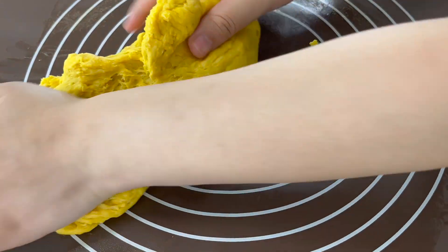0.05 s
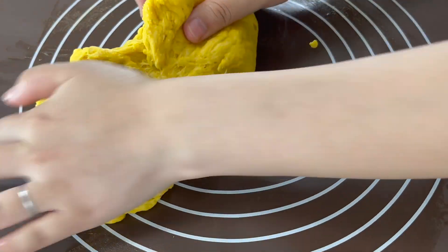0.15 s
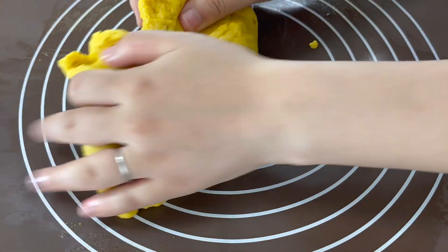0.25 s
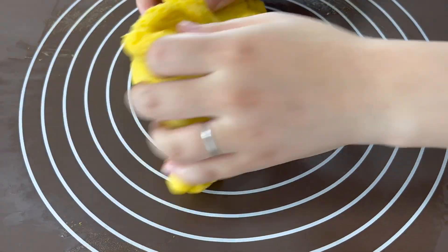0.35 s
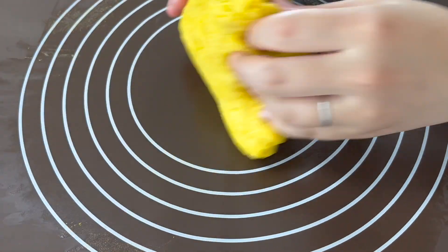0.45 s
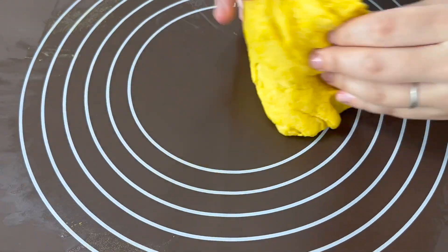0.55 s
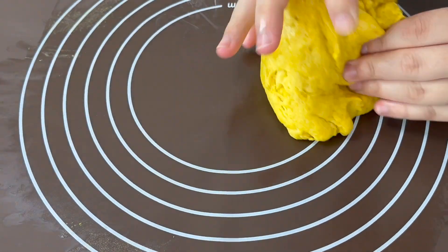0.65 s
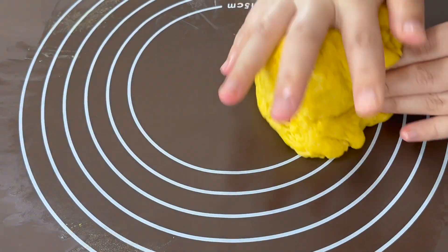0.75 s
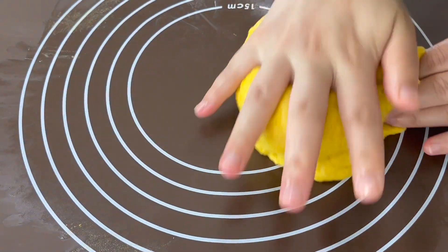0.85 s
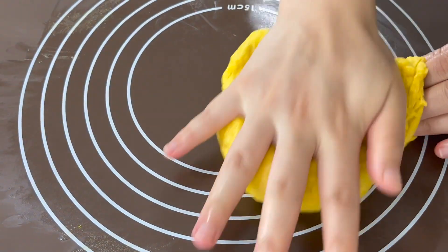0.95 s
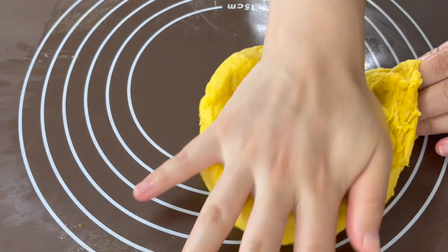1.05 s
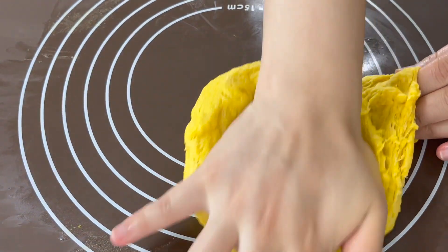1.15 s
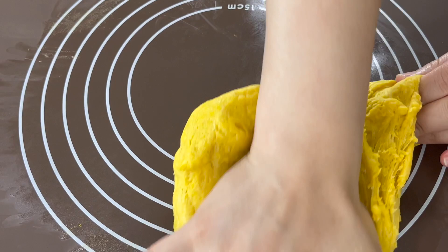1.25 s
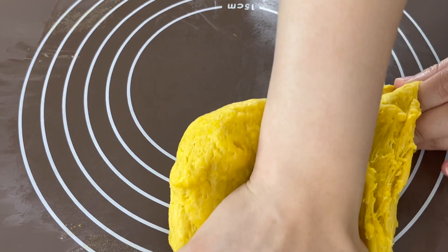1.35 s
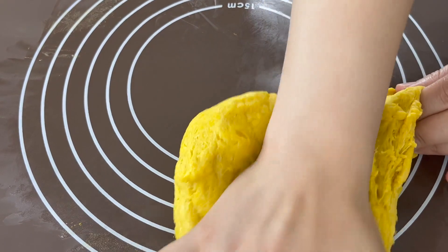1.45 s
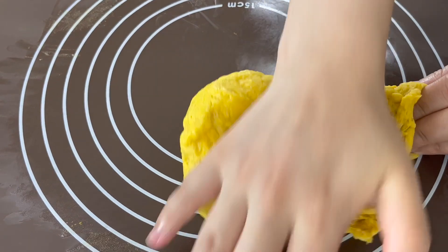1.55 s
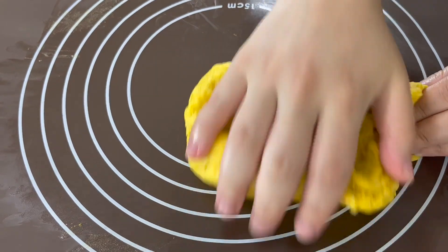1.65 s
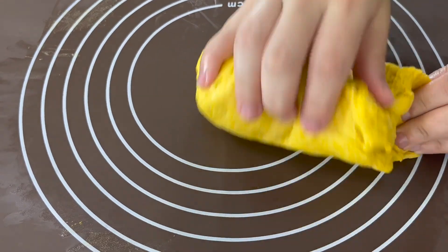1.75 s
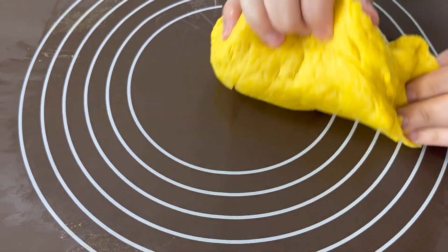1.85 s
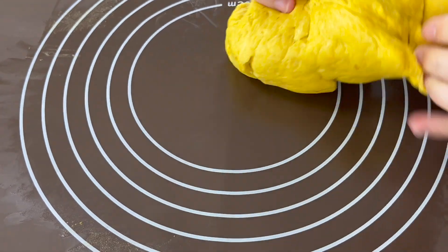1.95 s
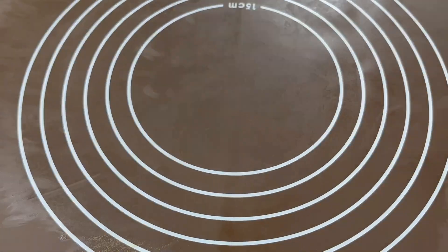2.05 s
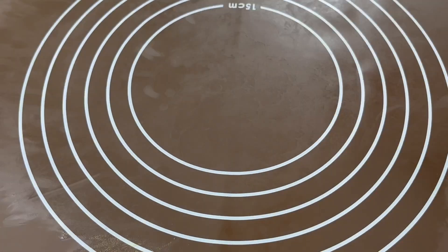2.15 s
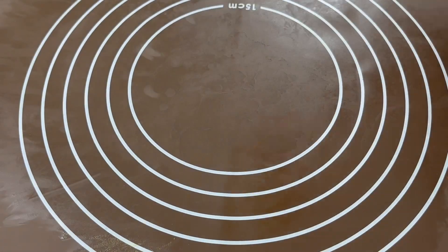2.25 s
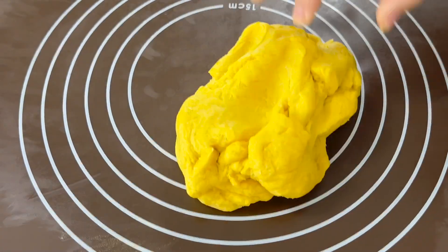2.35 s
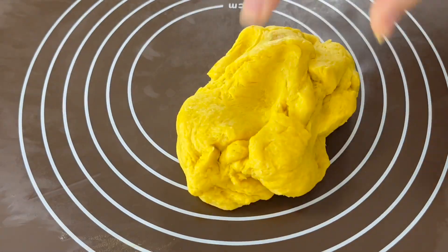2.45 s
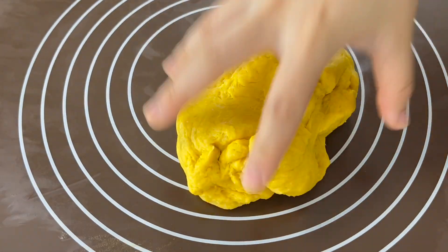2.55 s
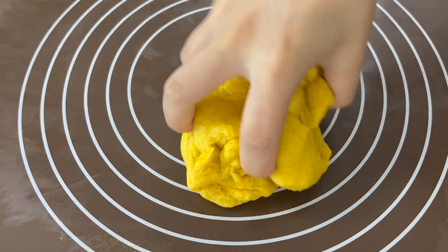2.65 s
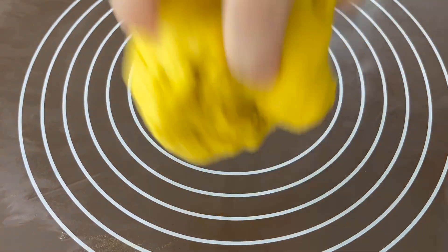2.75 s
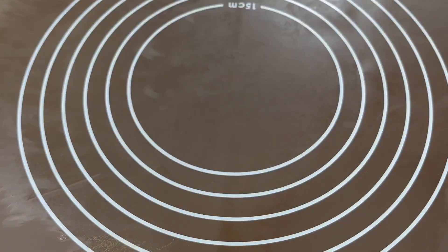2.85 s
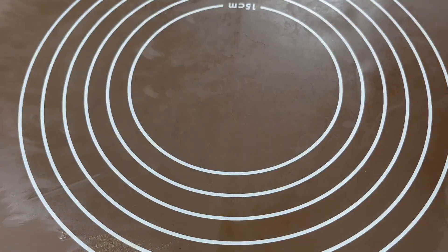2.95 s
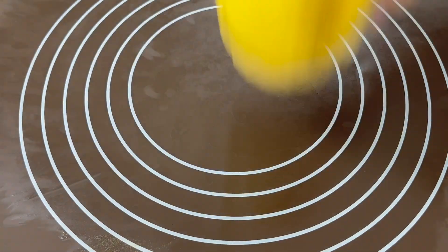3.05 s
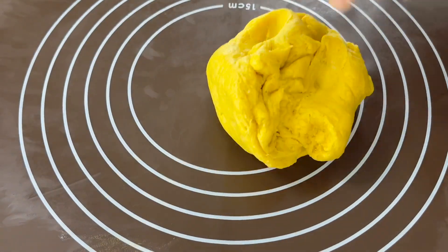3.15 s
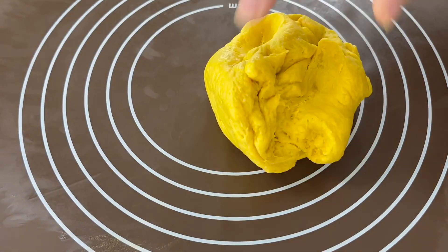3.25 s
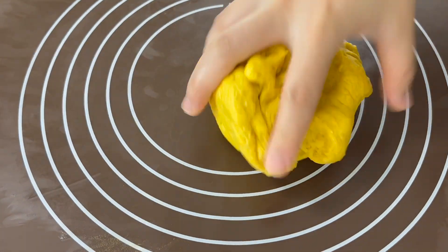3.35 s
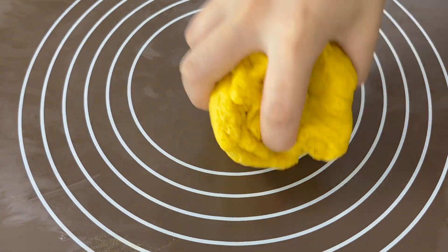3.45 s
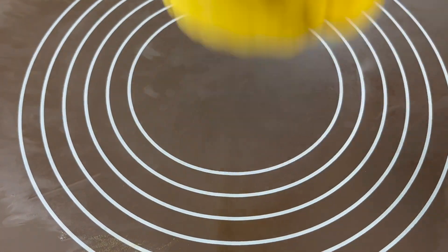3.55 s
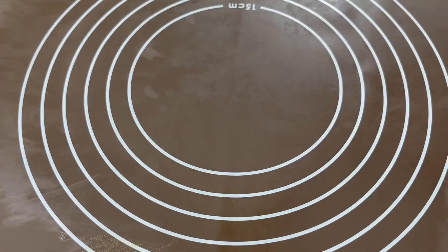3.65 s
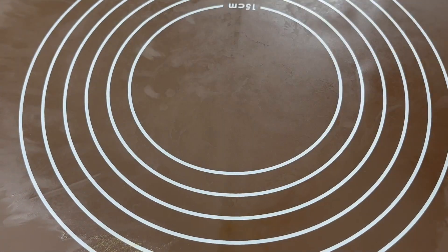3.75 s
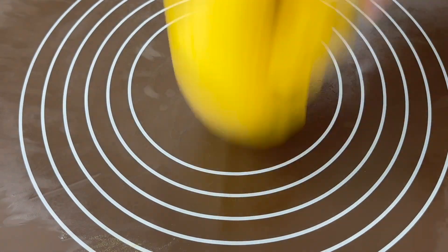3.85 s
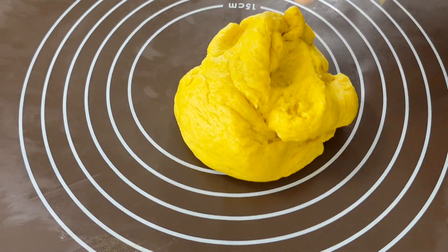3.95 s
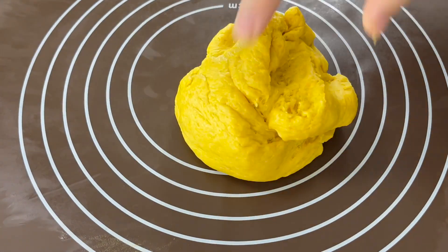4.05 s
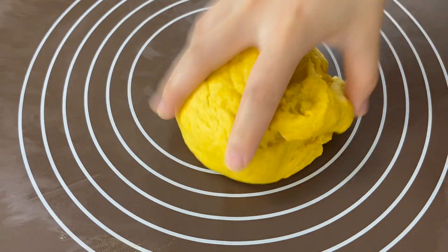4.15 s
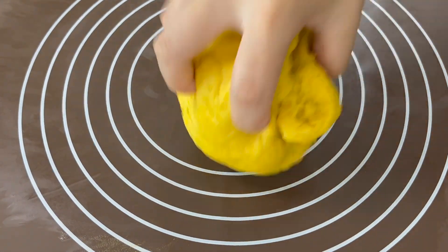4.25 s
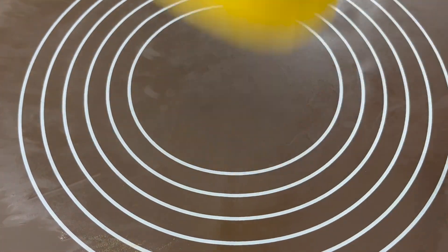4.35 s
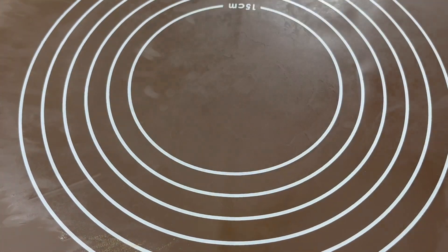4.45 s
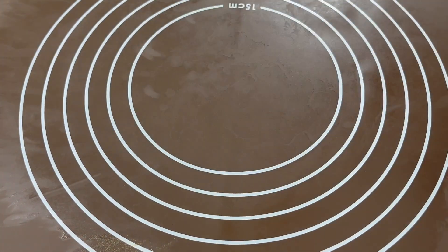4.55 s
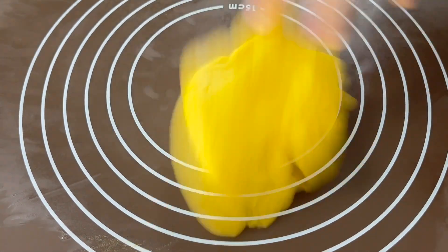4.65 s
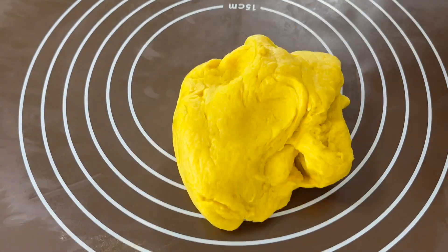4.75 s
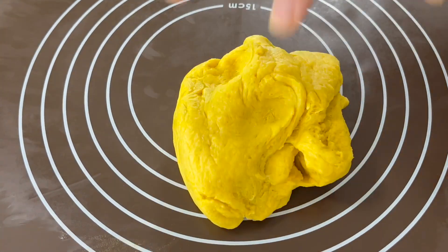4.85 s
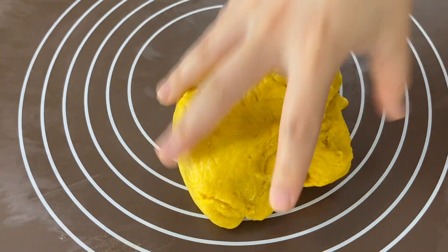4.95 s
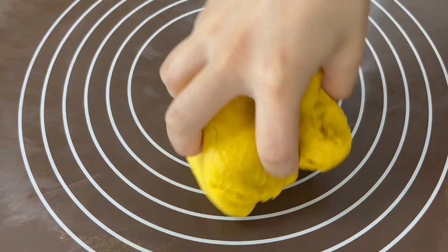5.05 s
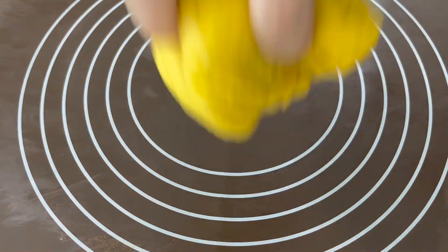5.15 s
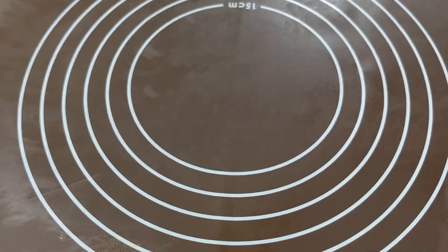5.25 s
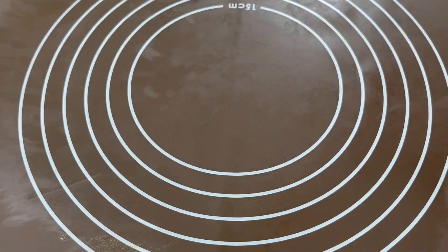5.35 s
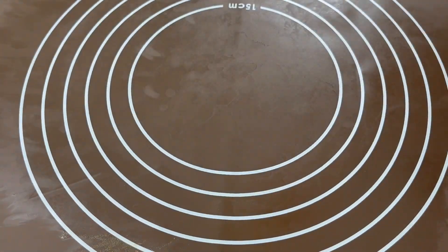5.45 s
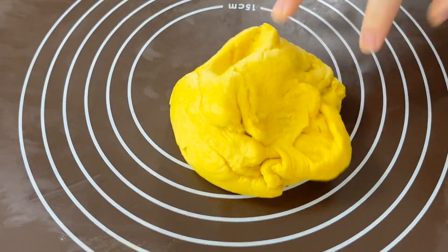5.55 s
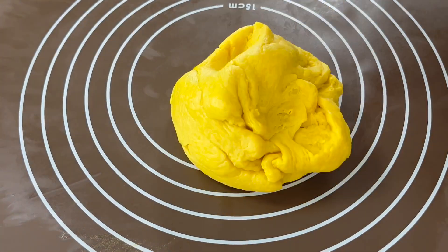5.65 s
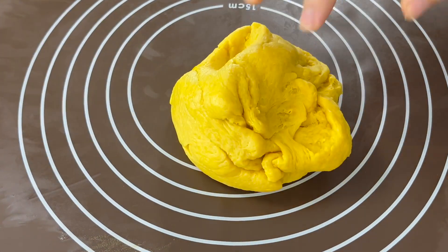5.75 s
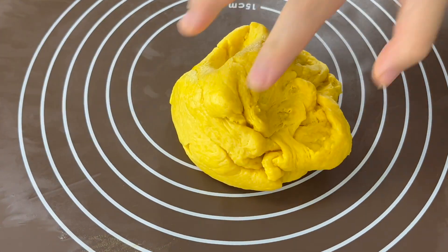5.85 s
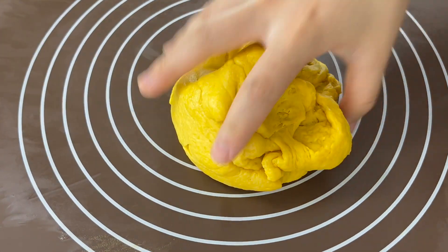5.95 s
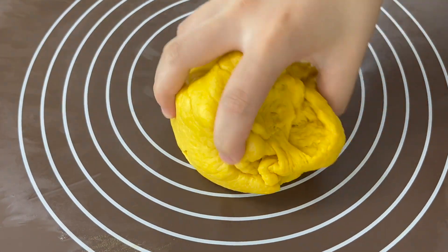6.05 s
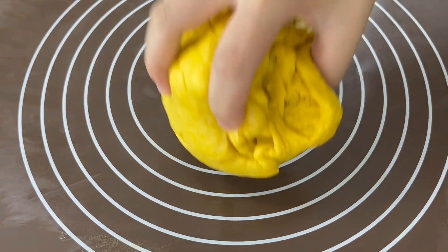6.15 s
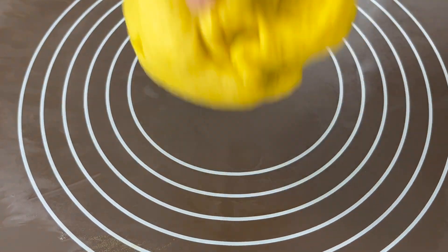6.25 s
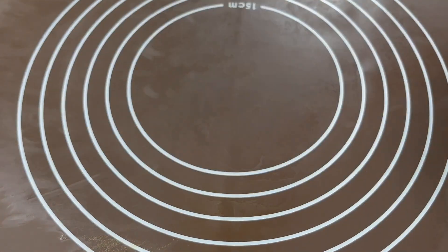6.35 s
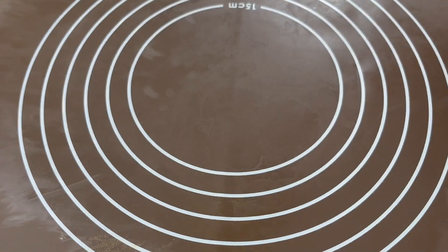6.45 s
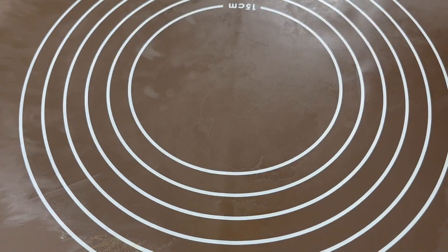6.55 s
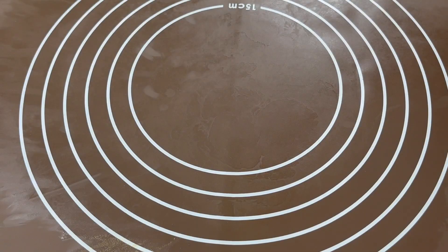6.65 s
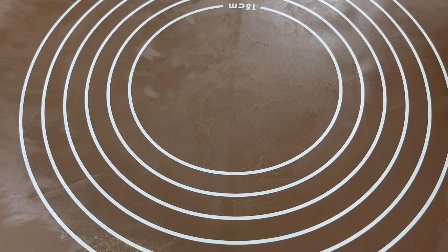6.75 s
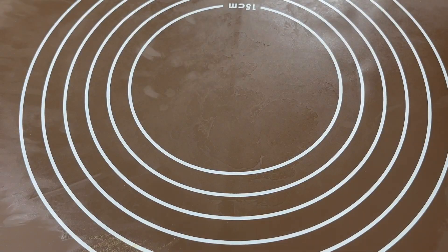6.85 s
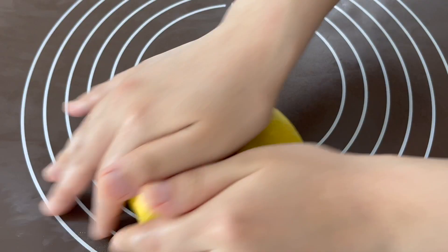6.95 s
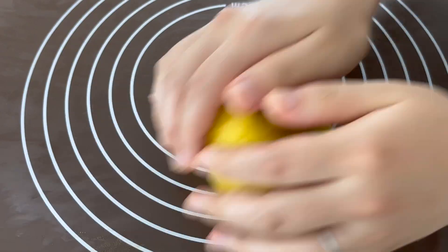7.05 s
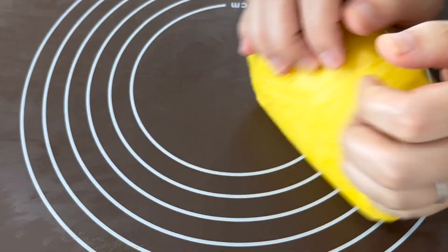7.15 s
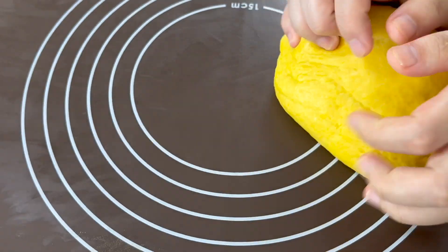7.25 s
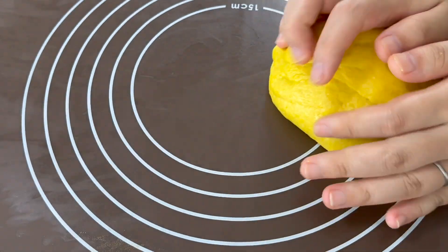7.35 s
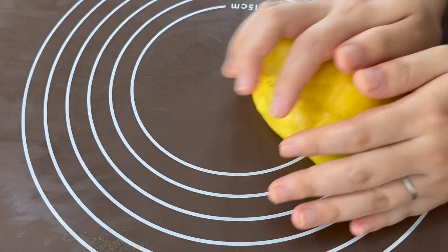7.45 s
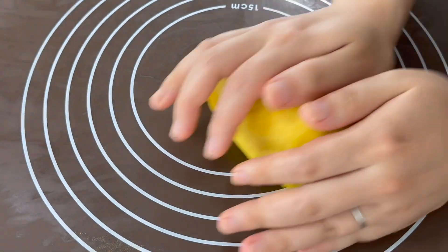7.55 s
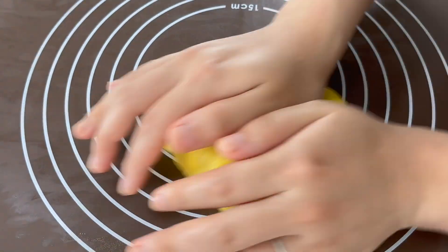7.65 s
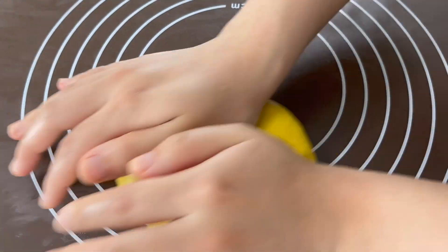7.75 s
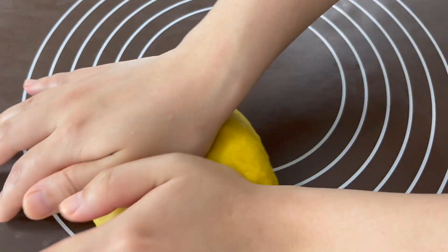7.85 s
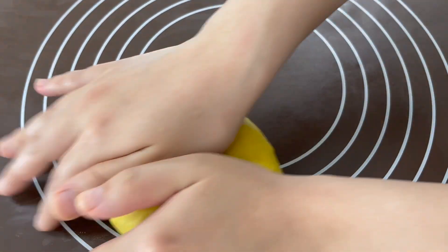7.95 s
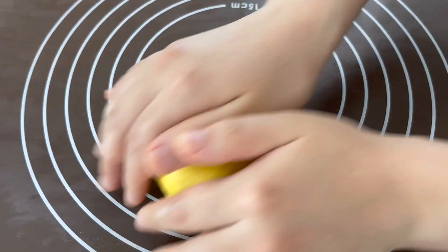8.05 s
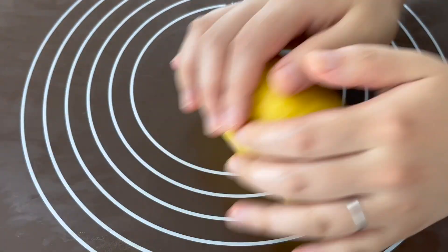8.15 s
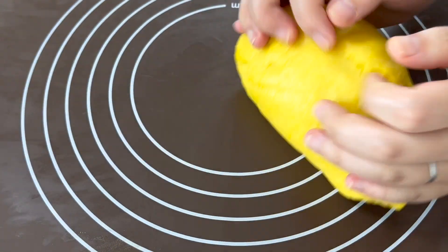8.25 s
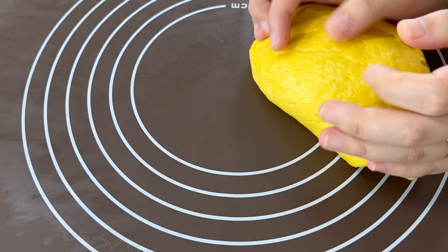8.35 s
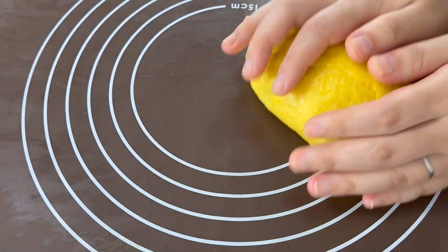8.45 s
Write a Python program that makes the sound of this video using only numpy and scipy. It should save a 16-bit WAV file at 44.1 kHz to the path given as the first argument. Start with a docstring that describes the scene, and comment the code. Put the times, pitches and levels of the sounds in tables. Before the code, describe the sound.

Soft dough is folded with faint sticky crackles, then slammed five times onto a mat-covered table with deep ringing thuds, then quietly rolled by hand.

```python
"""Over a rumbling, faintly airy room tone, hands fold soft dough on a silicone mat: filtered grains crackle and rub.
Air blisters pop as short falling tones, and hand bumps ring the table's decaying sine modes.
Five slams follow: noise bursts spit and smack, an air pocket pops, the table booms and a small, hard kitchen rings.
After each slam the sticky dough peels off the mat in speeding grains that end with a snap.
Last, both palms roll the dough, with more rubbing, crackle and pops."""
import sys
import numpy as np
from scipy import signal
from scipy.fft import rfft, irfft, next_fast_len
from scipy.io import wavfile
from scipy.ndimage import uniform_filter1d, minimum_filter1d, map_coordinates

SR = 44100
rng = np.random.default_rng(int(sys.argv[2]) if len(sys.argv) > 2 else 0)


def store_pcm(level_fs):
    """Save levels as 16-bit WAV."""
    pcm = np.round(np.clip(level_fs, -1, 1) * 32767).astype(np.int16)
    wavfile.write(sys.argv[1], SR, np.atleast_2d(pcm).T)


N = 375291
TIME = np.arange(N) / SR
AGE = np.arange(SR) / SR  # s since an event began
TOP_HZ = 16600


def amp(db):
    """Decibels to gain."""
    return 10 ** (np.asarray(db) / 20)


def unit(x):
    """Scale to rms 1."""
    return x / np.sqrt(np.mean(x ** 2) + 1e-20)


def along(points, hz):
    """Read (Hz, value) points on a log-frequency axis."""
    points_hz, values = np.transpose(points)
    return np.interp(np.log(hz + 1), np.log(points_hz), values)


def gains(rows):
    """One gain per sample for each dB column, silent outside the rows."""
    row_s, *columns_db = np.transpose(rows)
    active = (TIME >= row_s[0] - .02) * (TIME <= row_s[-1] + .02)
    return [amp(np.interp(TIME, row_s, db)) * active for db in columns_db]


def add(track, start_s, sound):
    """Mix a sound into a track from start_s."""
    start = max(round(start_s * SR), 0)
    part = sound[..., :N - start]
    track[..., start:start + part.shape[-1]] += part


def filtered(x, response):
    """Multiply the spectrum of x by a response of frequency."""
    n = x.shape[-1]
    padded = next_fast_len(n + 8192)
    spectrum = rfft(x, padded) * response(np.fft.rfftfreq(padded, 1 / SR))
    return irfft(spectrum, padded)[..., :n]


def coloured(x, spectrum):
    """Impose a spectrum on x, at rms 1."""
    return unit(filtered(x, lambda hz: amp(along(spectrum, hz))))


# stereo width of diffuse sound: (freq_hz, side_to_mid_db)
SIDE_WIDTH = [(40, -12.5), (130, -10), (280, -7.5), (600, 0.5), (1500, -0.5), (4000, -0.5), (12000, -2.5)]


def diffuse(spectrum, size, swell=1):
    """Stereo noise from all around: alike in the bass, nearly unrelated in the treble."""
    mid, side = coloured(swell * rng.standard_normal((2, size)), spectrum)
    side = filtered(side, lambda hz: amp(along(SIDE_WIDTH, hz)))
    return np.array([mid + side, mid - side])


# room tone over time: (time_s, rumble_db, air_db)
ROOM_LEVELS = [(0, -60.5, -81), (2.05, -67.5, -79), (2.15, -55, -75.5), (6.2, -58.5, -74),
               (6.9, -59.5, -68.5), (7.0, -56, -65.5), (8.5, -55, -64)]
# rumble spectrum: (freq_hz, level_db)
RUMBLE_SPECTRUM = [(20, 2), (38, -8), (50, 3), (70, -6), (110, -9.5), (180, -9.5), (300, -19), (700, -43.5),
                   (4000, -88)]
# air spectrum: (freq_hz, level_db)
AIR_SPECTRUM = [(100, -12), (300, -1.5), (600, -2), (1400, -5), (2200, -19), (4000, -29), (9000, -32),
                (16000, -38)]


def room_tone():
    """Low rumble and faint air: diffuse noise whose level jumps up near 2.1 s and steps up again near 7 s."""
    rumble, air = gains(ROOM_LEVELS)
    return rumble * diffuse(RUMBLE_SPECTRUM, size=N) + air * diffuse(AIR_SPECTRUM, size=N)


def grains(spectrum, rate_hz, spread_db):
    """Tiny sticky bonds break at random, with uneven sizes."""
    sizes = rng.standard_normal(N) * amp(spread_db * np.clip(rng.standard_normal(N), -2, 2))
    breaks = rng.random(N) < rate_hz / SR
    return coloured(sizes * breaks, spectrum)


STROKE_SHAPE = 1.1  # 1 = pointed swell, 2 = rounded
GRIP_DB, GRIP_RATE_HZ = 3, 110  # skin catches and slips
LEAN_S = .04  # time to put the weight on or take it off
# table under leaning palms: (freq_hz, level_db)
PRESS_SPECTRUM = [(20, -28), (38, -18), (54, 9.5), (70, -4), (120, -8.5), (200, -9.5), (300, -21),
                  (700, -50.5), (4000, -90)]
# sticky surface: (freq_hz, level_db)
TACK_SPECTRUM = [(1500, -18), (4500, -4), (6400, -10), (8000, 1), (10500, -0.5), (16000, -6)]


def kneading(strokes, lean, skin_spectrum, blister_db):
    """Palms press the table; the surface crackles with stroke speed, skin rubs with its square, blisters tick."""
    rub, tack = np.zeros((2, N))
    for full_speed_s, rise_s, fall_s, rub_db, tack_db in strokes:
        distance = np.maximum((full_speed_s - TIME) / rise_s, (TIME - full_speed_s) / fall_s)
        speed = np.exp(-distance ** STROKE_SHAPE)
        rub += amp(rub_db) * speed ** 2
        tack += amp(tack_db) * speed
    start_s, end_s, press_db = lean
    press = amp(press_db) * np.clip(np.minimum(TIME - start_s, end_s - TIME) / LEAN_S, 0, 1)
    weight = press * coloured(rng.standard_normal(N), PRESS_SPECTRUM)
    catches = map_coordinates(rng.standard_normal(SR), [TIME * GRIP_RATE_HZ], order=1)
    rubbing = rub * amp(GRIP_DB * catches) * grains(skin_spectrum, rate_hz=5200, spread_db=3)
    bonds = grains(TACK_SPECTRUM, rate_hz=4100, spread_db=0.5)
    blisters = grains(TACK_SPECTRUM, rate_hz=40, spread_db=0)
    return weight + rubbing + tack * (bonds + amp(blister_db) * blisters)


# folding strokes: (full_speed_s, rise_s, fall_s, rub_db, tack_db)
FOLD_STROKES = [(.13, 0.044, 0.085, -61, -64), (.34, 0.16, 0.23, -63.5, -65.5), (.6, 0.072, 0.12, -83, -86),
                (.95, 0.18, 0.25, -74, -65), (1.23, 0.12, 0.099, -73.5, -64.5),
                (1.478, 0.033, 0.0654, -49.5, -60), (1.74, 0.084, .09, -59, -64.5),
                (1.89, 0.082, 0.11, -68, -65)]
# palms lean on the table: (start_s, end_s, press_db)
FOLD_LEAN = (0, 2.7, -64.5)
# skin on folding or tearing dough: (freq_hz, level_db)
RUB_SPECTRUM = [(200, -19.5), (500, 2.5), (1000, -5), (1700, -0.5), (2600, -10.5), (4500, -10), (7000, -24),
                (14000, -36)]


def folding():
    """Strokes fold and squash the dough: rubbing, crackle and palm weight."""
    return kneading(FOLD_STROKES, FOLD_LEAN, RUB_SPECTRUM, blister_db=-10.5)


def pocket(pitch_hz, t60_s, sweep, settle_s, attack_s):
    """Trapped air pops: a few cycles that fall to pitch_hz."""
    cycles = pitch_hz * (AGE + sweep * settle_s * (1 - np.exp(-AGE / settle_s)))
    return np.sin(2 * np.pi * cycles) * amp(-60 * AGE / t60_s) * (1 - np.exp(-AGE / attack_s))


# larger air blisters: (start_s, peak_db, pitch_hz)
BLISTERS = [(.092, -45.5, 830), (.127, -42, 805), (.129, -35, 2930), (.267, -48, 595), (.556, -49.5, 1240),
            (.769, -41, 8800), (.807, -42, 9200), (1.441, -35.5, 1770), (1.471, -28.5, 800),
            (1.475, -36, 1450), (1.488, -29.5, 1120), (1.797, -43.5, 1630), (1.885, -36, 1590),
            (1.894, -40.5, 1496), (7.05, -42, 1892), (7.335, -47, 565), (8.067, -43, 1860),
            (8.326, -48, 650)]
# dough leaves the mat: (release_s, hiss_db, tearing_db, rise_s, snap_db, snap_hz)
RELEASES = [(2.703, -57, -53, 0.07, -42.5, 1834), (3.475, -54.5, -48, 0.029, -38.5, 2560),
            (4.265, -54.5, -47, .062, -43.5, 1696), (5.089, -55.5, -50, .061, -26.5, 2410),
            (6.141, -60, -53.5, 0.042, -35.5, 2603)]


def snaps(click_db=-12, click_t60_s=0.017):
    """Blisters and the last bond of each peel pop: a pitched tick and a wet click around its pitch."""
    out = np.zeros(N)
    last_bonds = [(release_s, snap_db, snap_hz) for release_s, *_, snap_db, snap_hz in RELEASES]
    for start_s, level_db, pitch_hz in [*BLISTERS, *last_bonds]:
        band = lambda hz: (hz * pitch_hz / (hz ** 2 + pitch_hz ** 2)) ** 3
        click = unit(filtered(rng.standard_normal(SR), band))
        fading_click = amp(click_db - 60 * AGE / click_t60_s) * click
        tick = pocket(pitch_hz, t60_s=8 / pitch_hz, sweep=.2, settle_s=.0006, attack_s=.0002)
        add(out, start_s, amp(level_db) * (tick + fading_click))
    return out


# table modes: (freq_hz, level_db, t60_s, build_s)
TABLE_MODES = [(45.5, -4, .48, 0.022), (51.8, -10.5, 0.26, 0.01), (62.7, -16, 0.75, 0.0033),
               (81.3, -19.5, 0.3, .01), (102, -3.5, 0.18, 0.0028), (124.9, -15.5, 0.58, 0.0092),
               (135.4, -16.5, 0.71, .015), (150.5, -22.5, 0.62, 0.013), (176.4, -15, 0.33, 0.1),
               (185.6, -8.5, 0.57, 0.022), (205.8, -16.5, .55, 0.0052), (333.6, -23.5, 0.49, 0.025),
               (364, -21, 0.58, .015), (504.3, -24.5, 0.65, 0.0069), (539, -23.5, 0.46, 0.023),
               (619, -27, 0.25, 0.027), (724, -26.5, .5, 0.039)]


def table(scatter_db, soft_hz):
    """Table modes swell and ring after a blow; a softer blow stirs only the lowest."""
    hz, mode_db, t60_s, build_s = np.transpose(TABLE_MODES)[:, :, None]
    level_db = mode_db + scatter_db * rng.standard_normal(mode_db.shape) - 60 * AGE / t60_s
    softness = 1 / (1 + (hz / soft_hz) ** 2)
    swell = 1 - np.exp(-AGE / build_s)
    return np.sum(amp(level_db) * softness * swell * np.sin(2 * np.pi * hz * AGE), axis=0)


# hands bump the table through the dough: (start_s, level_db, soft_hz)
HAND_BUMPS = [(0.216, -45, 171), (0.54, -45, 201), (1.001, -47, 200), (2.62, -33.5, 56),
              (3.40, -27.5, 67.8), (4.177, -25.5, 110), (4.967, -28, 80.7), (5.979, -38.5, 99.4),
              (7.659, -46.5, 109.6), (7.76, -44, 110)]


def bumps():
    """Soft blows through the dough stir the low table modes."""
    out = np.zeros(N)
    for start_s, level_db, soft_hz in HAND_BUMPS:
        add(out, start_s, amp(level_db) * table(scatter_db=4.0, soft_hz=soft_hz))
    return out


# kitchen decay: (freq_hz, t60_s)
KITCHEN_DECAY = [(50, 0.74), (150, 0.66), (500, 0.58), (1200, 0.57), (4000, 0.55), (8000, 0.49),
                 (15000, 0.19)]


def dying(noise):
    """Each frequency fades at the kitchen's own pace."""
    hz, frame_s, z = signal.stft(noise, SR, nperseg=512)
    decay = amp(-60 * frame_s / along(KITCHEN_DECAY, hz)[:, None])
    return signal.istft(z * decay, SR, nperseg=512)[1][:, :noise.shape[-1]]


def walls(x, gap_s=0.00053):
    """The kitchen answers the small sounds: convolution with a decaying diffuse tail."""
    spectrum = [(60, -1.5), (400, -6.0), (4500, -5.5), (8000, -4.5), (16000, -4.5)]  # (Hz, dB)
    tail = dying(diffuse(spectrum, size=SR)) * (AGE > gap_s)
    return signal.fftconvolve(x[None], tail / np.linalg.norm(tail[0]), axes=1)[:, :N]


def near(x, lag_s=.000021):
    """A sound from the mat reaches the left port just before the right."""
    return filtered(x, lambda hz: np.exp(np.outer([1, -1], 1j * np.pi * hz * lag_s)))


REBOUND_S = .058  # until the table top springs back against the dough
SPIT_DB, SPIT_DB_PER_SLAP_DB = -21, 0.42  # SPIT_DB belongs to a 0 dB slap
# slams: (start_s, slap_db, pocket_hz, smack_db, smack_hz, sizzle_db, spread_s, rebound_db,
#         boom_db, ring_db, ring_treble_db)
SLAM_EVENTS = [(2.319, 1.5, 520, -17.5, 1750, -7.5, 0.0047, -6.5, -1.5, -17.5, 1),
               (3.0851, 3.5, 640, -17, 1250, 2, 0.0017, -14.5, -3.5, -18.5, -4.5),
               (3.8814, 8, 690, -21, 1300, 4.5, .0015, -12, -0.5, -12.5, -2.5),
               (4.6740, 9.5, 594, -13, 2397, 0.5, .002, -15.5, 1, -12, 0),
               (5.5340, 0.5, 760, -6.5, 1620, 13.5, 0.001, -12.5, -3.5, -15.5, -2.5)]
# spat air: (freq_hz, level_db)
SPIT_SPECTRUM = [(1000, -7), (3000, 1.5), (5000, 1), (6500, -5), (10000, -1), (16000, -5.5)]


def slaps(lead_s=.015, narrow=1.8, settle_db=-6, settle_spread_s=0.0046):
    """Air spits from under the rim, dough smacks flat, a pocket pops; the rebound repeats it softly."""
    out = np.zeros(N)
    for start_s, slap_db, pocket_hz, smack_db, smack_hz, sizzle_db, spread_s, rebound_db, *_ in SLAM_EVENTS:
        band = lambda hz: 1 / (1 + (narrow * np.log((hz + 1) / smack_hz)) ** 2) ** 2
        sizzle = lambda hz: amp(sizzle_db * (hz / TOP_HZ) ** 6 * (hz < TOP_HZ))
        smack = unit(filtered(rng.standard_normal(SR), band))
        spit = filtered(coloured(rng.standard_normal(SR), SPIT_SPECTRUM), sizzle)
        squirt = amp(smack_db) * smack + amp(SPIT_DB + SPIT_DB_PER_SLAP_DB * slap_db) * spit
        landing = np.exp(-((AGE - lead_s) / spread_s) ** 2)
        rebound = np.exp(-((AGE - lead_s - REBOUND_S) / settle_spread_s) ** 2)
        settling = amp(rebound_db + settle_db) * rebound
        add(out, start_s - lead_s, (landing + settling) * squirt)
        pop = amp(slap_db) * pocket(pocket_hz, t60_s=.012, sweep=0.35, settle_s=0.00058, attack_s=0.00034)
        add(out, start_s, pop)
        add(out, start_s + REBOUND_S, amp(rebound_db) * pop)
    return out


def booms(stop_s=.019, stop_width_s=0.0063, stop_db=1):
    """The flattening lump stops with one low push and shakes the table modes."""
    out = np.zeros(N)
    u = (AGE - stop_s) / stop_width_s
    push = amp(stop_db) * -u * np.exp(-u ** 2)
    for start_s, *_, boom_db, ring_db, treble_db in SLAM_EVENTS:
        add(out, start_s, amp(boom_db) * (push + table(scatter_db=1.5, soft_hz=2000)))
    return out


# ringing table top and walls: (freq_hz, level_db)
RING_SPECTRUM = [(30, -35.5), (70, -9), (120, -0.5), (200, -0.5), (270, -4), (520, -4), (720, -6.5),
                 (1050, -13.5), (1600, -19.5), (2500, -26.5), (4600, -26.5), (6400, -35.5), (10000, -34.5),
                 (16000, -39.5)]


def reflections(clump_db=3, clump_rate_hz=400):
    """Dense wall reflections in uneven bunches: diffuse noise with a random level."""
    bunches = map_coordinates(rng.standard_normal(SR), [AGE * clump_rate_hz], order=1)
    return diffuse(RING_SPECTRUM, size=SR, swell=amp(clump_db * bunches))


def ringing(build_s=0.0064, treble_hz=1500, surge_db=2):
    """Table top and walls ring after each slam, partly alike each time, and step up at the rebound."""
    out, common = np.zeros((2, N)), reflections()
    for start_s, *_, rebound_db, boom_db, ring_db, treble_db in SLAM_EVENTS:
        mixed = (common + reflections()) / np.sqrt(2)
        noise = filtered(mixed, lambda hz: amp(treble_db * hz / (hz + treble_hz)))
        surge = 1 + amp(rebound_db + surge_db) * (AGE > REBOUND_S)
        swell = (1 - np.exp(-AGE / build_s)) * surge
        add(out, start_s, amp(ring_db) * dying(noise) * swell)
    return out


def peels(fall_s=.004):
    """Dough leaves the mat faster and faster: hiss follows speed, tearing its square."""
    hiss, tearing = np.zeros((2, N))
    for release_s, hiss_db, tearing_db, rise_s, *_ in RELEASES:
        speed = np.exp(-np.maximum((release_s - TIME) / rise_s, (TIME - release_s) / fall_s))
        hiss += amp(hiss_db) * speed
        tearing += amp(tearing_db) * speed ** 2
    hissing = hiss * grains(TACK_SPECTRUM, rate_hz=9000, spread_db=3)
    return hissing + tearing * grains(RUB_SPECTRUM, rate_hz=6000, spread_db=3)


# rolling strokes: (full_speed_s, rise_s, fall_s, rub_db, tack_db)
ROLL_STROKES = [(6.97, 0.019, 0.057, -58, -65), (7.05, 0.058, 0.14, -58, -65), (7.67, .15, .1, -71.5, -63),
                (7.98, .09, 0.079, -66.5, -67), (8.07, 0.063, 0.085, -56.5, -69),
                (8.27, 0.13, 0.14, -70, -68.5)]
# palms lean on the table: (start_s, end_s, press_db)
ROLL_LEAN = (6.92, 8.6, -57)
# skin on rolling dough: (freq_hz, level_db)
ROLL_SPECTRUM = [(300, -5), (700, -6.5), (1400, -2.5), (2000, 3), (2600, -6), (4500, -9.5), (7000, -23),
                 (14000, -34.5)]


def rolling():
    """Strokes roll the dough under the palms: rubbing, crackle and palm weight."""
    return kneading(ROLL_STROKES, ROLL_LEAN, ROLL_SPECTRUM, blister_db=-18)


def scene():
    """Hand work and slams on the mat, in the kitchen."""
    hands = folding() + snaps() + peels() + rolling()
    direct = near(hands + bumps() + slaps() + booms())
    return room_tone() + direct + amp(-8.5) * walls(hands) + ringing()


def limiter(x, hold_s=0.017, ease_s=0.02):
    """Gain ducks under each peak, holds, then eases back up."""
    needed = np.minimum(1, .93 / (np.abs(x).max(axis=0) + 1e-9))
    held, eased = int(hold_s * SR) | 1, int(ease_s * SR) | 1
    gain = minimum_filter1d(needed, held, origin=held // 2)
    gain = np.minimum(gain, uniform_filter1d(gain, eased, origin=eased // 2))
    return x * uniform_filter1d(minimum_filter1d(gain, size=89), size=89)


def record(dry, low_hz=38, notch_hz=12700, bell_width_hz=800, notch_db=-13, port_hz=15200, port_db=4):
    """Deep bass is cut; the microphone adds a treble notch and resonance; a limiter and a top-end cut follow."""
    bell = lambda hz, centre_hz: np.exp(-((hz - centre_hz) / bell_width_hz) ** 2)
    highpass = signal.butter(5, low_hz, "highpass", fs=SR, output="sos")
    heard = signal.sosfilt(highpass, dry)
    heard = filtered(heard, lambda hz: amp(notch_db * bell(hz, notch_hz) + port_db * bell(hz, port_hz)))
    return filtered(limiter(heard), lambda hz: np.clip((TOP_HZ - hz) / 700, 0, 1) ** 2)


dry = scene()
out = record(dry)
store_pcm(out)
```